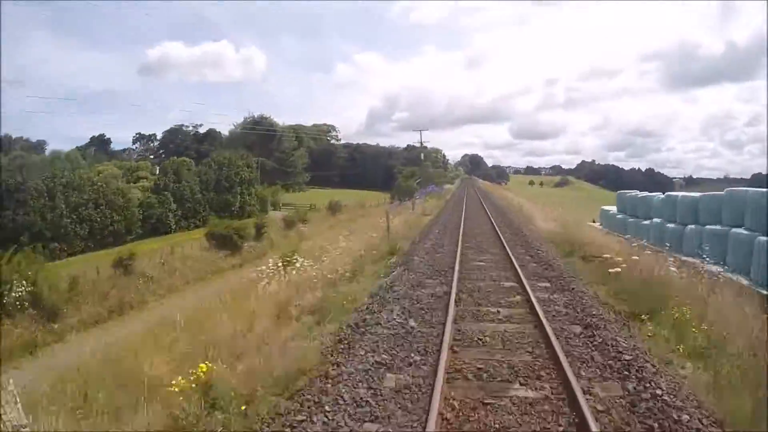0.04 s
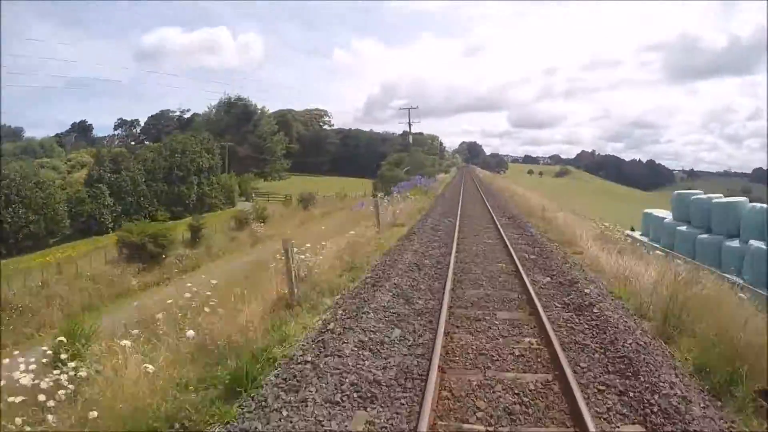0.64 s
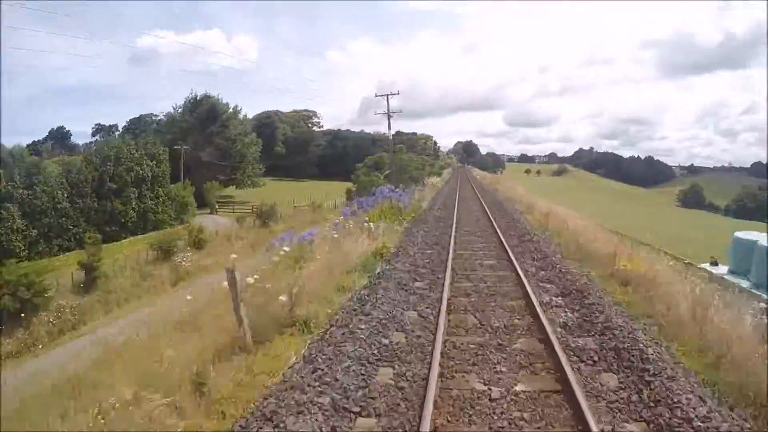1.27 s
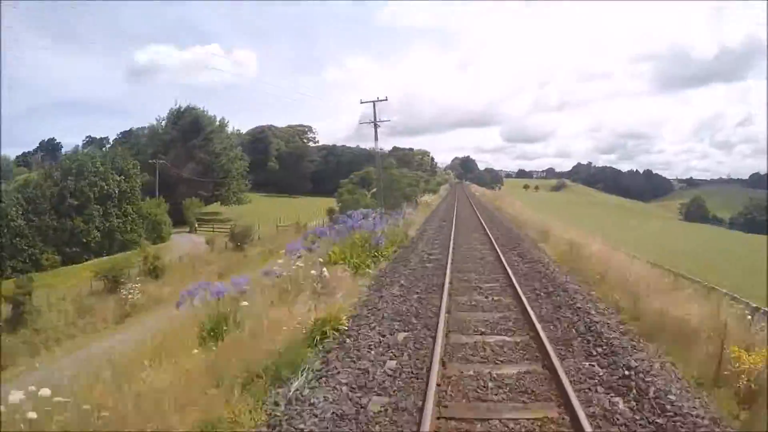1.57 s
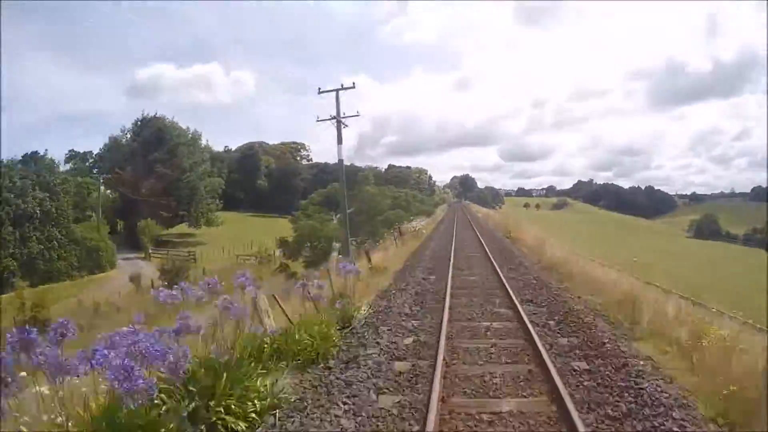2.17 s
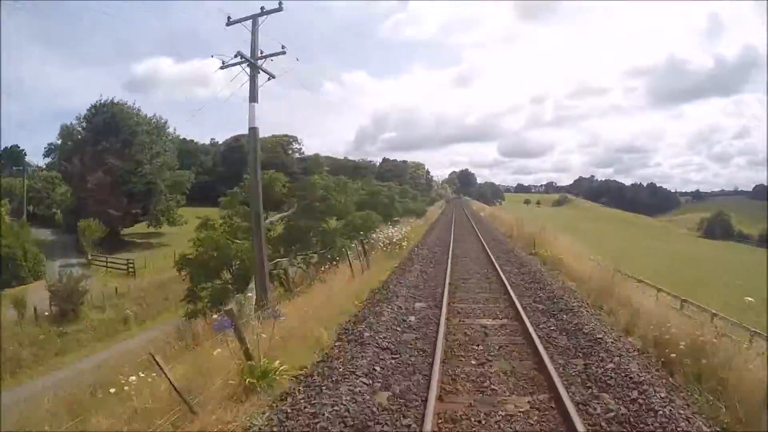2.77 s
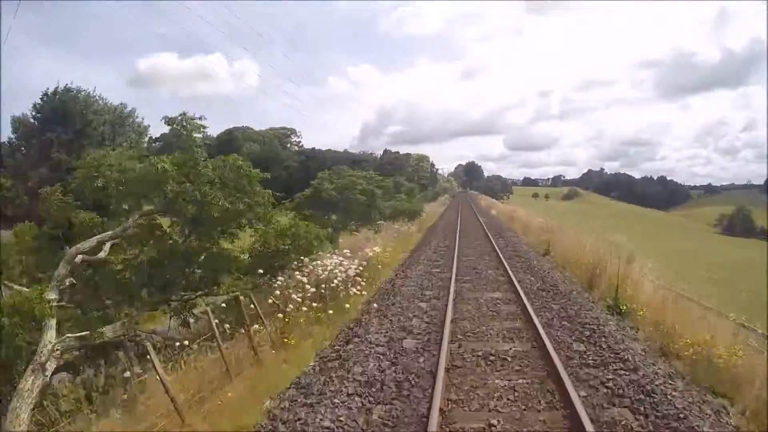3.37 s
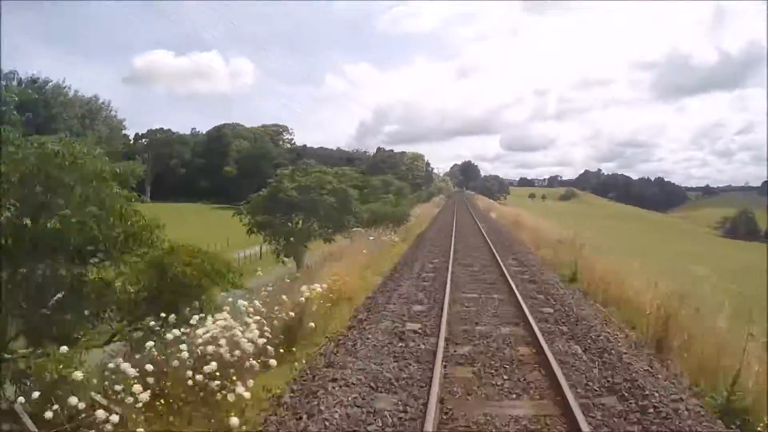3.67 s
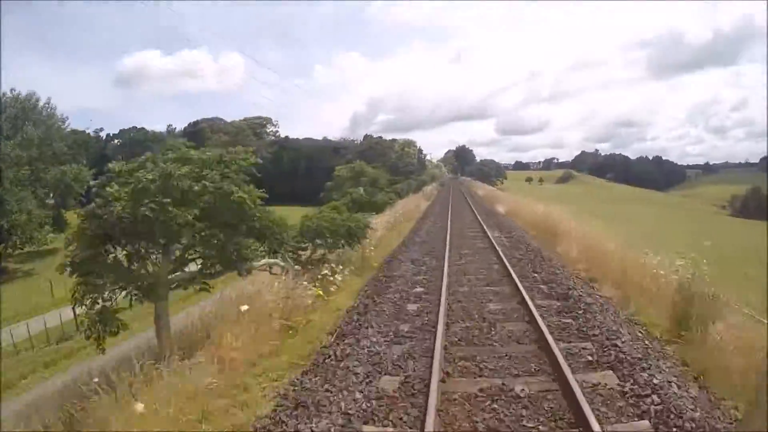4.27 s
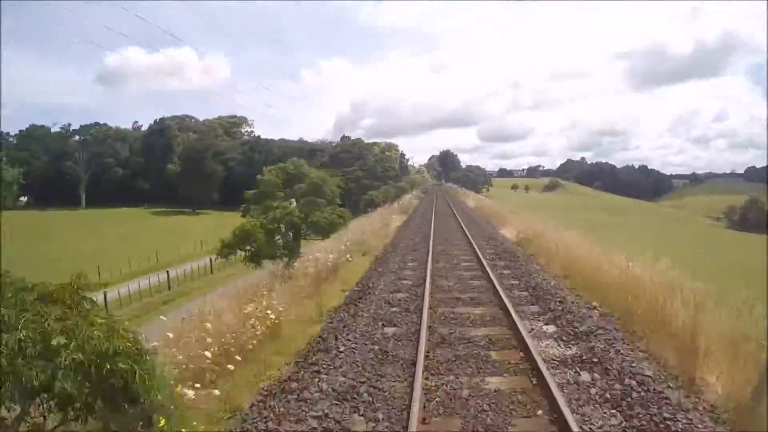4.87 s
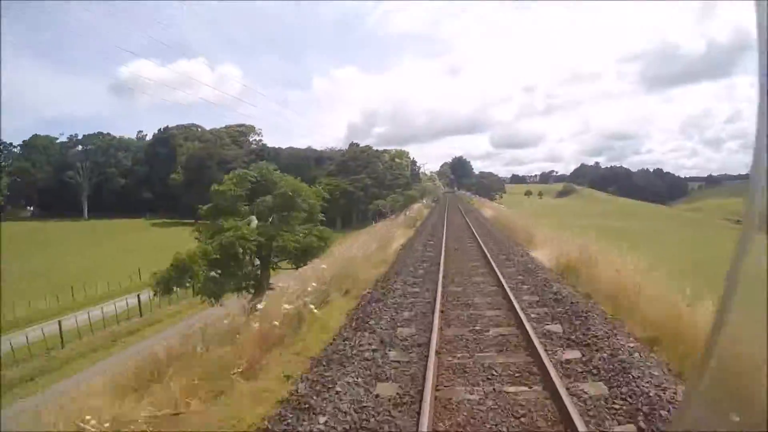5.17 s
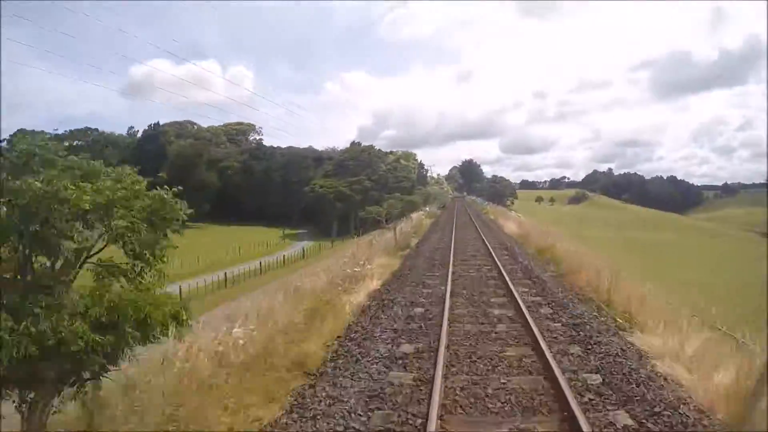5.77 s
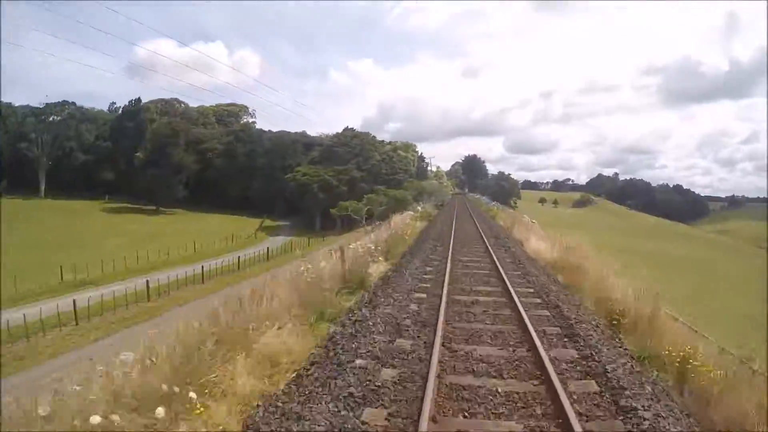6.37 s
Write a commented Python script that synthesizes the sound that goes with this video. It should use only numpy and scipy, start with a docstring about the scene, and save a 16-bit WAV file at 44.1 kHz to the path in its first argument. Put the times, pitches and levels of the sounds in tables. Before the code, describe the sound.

A small engine chugs at an even pace, with ticking valves and a metallic whirr, while wheels on rough rail shake a light trolley. Light rattles and a faint, high wheel squeal come and go. Late on, a sharp crack and deep thud distort the on-board microphone, and the sound turns quieter before gradually recovering. The rumble swells again near the end. Everything is close and in open air.

```python
"""A light rail trolley rumbles along a track, its small single-cylinder engine at a steady speed.
The rough rail shakes the chassis. The engine puffs exhaust, gasps for air and clatters as its piston
and valves strike. Loose parts rattle, a wheel squeals thinly, and the treble dips briefly now and then.
One hard jolt overloads the on-board microphone; its automatic volume control turns everything down
and slowly recovers."""
import sys
import numpy as np
from scipy import signal
from scipy.fft import rfft, irfft
from scipy.io import wavfile
from scipy.ndimage import uniform_filter1d

SR = 44100
rng = np.random.default_rng(int(sys.argv[2]) if len(sys.argv) > 2 else 0)


def dump_mix(stems):
    """Bounce the given channels to the path in sys.argv[1] as a 16-bit WAV at rate SR."""
    frames = np.atleast_2d(stems).T  # one column per channel
    limited = np.clip(frames, -1, 1)  # hard clip at full scale
    pcm = np.round(limited * 32767).astype(np.int16)
    wavfile.write(sys.argv[1], SR, pcm)


N = 291942
TIME = np.arange(N) / SR

# the tones at which the engine casing and covers ring: pitch_hz, width_hz, level_db
CASING_TONES = [(1120, 204, 4.5), (1814, 420, 2), (2188, 125, 2), (2394, 205, 3.5), (3372, 320, 1.5),
                (3730, 560, 4.5), (4706, 230, -6), (5590, 300, -6), (6900, 570, -10.5)]


def rumble(cycles):
    """Wheels on rough rail shake the chassis, which throbs with the engine; the upper part surges."""
    # how strongly the chassis rumbles, low to high: pitch_hz, level_db
    chassis_spectrum = [(10, 2), (25, 1), (60, 5), (110, 2.5), (160, -3), (210, -0.5), (280, -6.5),
                        (345, 0.5), (430, -3.5), (500, -13), (620, -26), (1000, -34.5), (2000, -62)]
    throb = 1 + 0.15 * np.cos(2 * np.pi * (cycles - .45))
    shake = rng.standard_normal(N) * throb
    upper = signal.sosfiltfilt(signal.butter(2, 240, "high", fs=SR, output="sos"), shake)
    surge = gain_of(1.3 * drift(11))
    rough_db = rough_rail_db()
    deep = gain_of(.8 * rough_db) * (shake - upper)
    return gain_of(-16.5) * shape_spectrum(deep + gain_of(rough_db) * surge * upper, chassis_spectrum)


def rough_rail_db():
    """The shaking swells and fades as the wheels cross each rough stretch of rail."""
    # rough stretches: middle_s, rise_db, length_s
    stretches = [(1.643, 3.5, 0.97), (4.09, 3.5, 0.22), (5.33, 5, .13), (6.436, 7, 0.29)]
    return sum(db * swell(middle_s, length_s) for middle_s, db, length_s in stretches)


def exhaust(cycles):
    """Muffled firing pulses make a hum: its low tones waver a little, the pipe smears the higher ones."""
    # tones of the hum: multiple (of the engine's cycle rate), level_db
    tones = [(1, -32), (2, -6), (3, 1.5), (4, -3), (5, -23), (6, -8), (7, -6), (8, 0.5), (9, -8),
             (10, -5.5), (11, -16), (12, -6.5), (13, -9.5), (14, -7.5), (15, -5), (16, -13.5), (17, -15.5),
             (18, -37), (19, -30), (20, -15), (21, -22), (22, -43.5)]
    # how the four lowest tones swell and sink: time_s, boost_db
    boom = [(0, 4), (1.5, -4.5), (3.2, 2), (4.8, 4), (5.4, -0.5), (6.6, 2.5)]
    hum, boom_db = np.zeros(N), curve(boom)
    for multiple, db in tones:
        smear = .25 * multiple * rng.standard_normal() + .016 * multiple * drift(2)
        level_db = db + (multiple <= 4) * boom_db + 1.6 * drift(4.6)
        hum += gain_of(level_db) * np.cos(2 * np.pi * multiple * (cycles - .5) + smear)
    return gain_of(-19) * unit_level(hum)


def clatter(cycles):
    """Piston and valves strike the casing in every cycle, over a steady whirr of moving parts."""
    # piston and valve blows: place_in_cycle (0 to 1), level_db
    strikes = [(0.182, 3), (0.452, 1), (0.681, 1), (.92, -6)]
    # the broad noise of the moving parts: pitch_hz, level_db
    whirr_spectrum = [(200, -19), (600, -9.5), (900, -1), (1600, 3.5), (2800, -2), (4200, -1), (6000, -7.5),
                      (7200, -11), (8200, -17.5), (10300, -20), (11500, -27.5), (14000, -27), (15500, -38)]
    blows = sum(gain_of(db) * burst(cycles, place, fade_cycles=0.4) for place, db in strikes)
    casing = np.zeros(N)
    for hz, width, db in CASING_TONES:
        buzz = (1.05 + blows) * rng.standard_normal(N) * gain_of(drift(6))  # each panel has its own
        casing += gain_of(db) * unit_level(ring(ring(buzz, hz, width), hz, width))
    whirr = shape_spectrum((3.1 + blows) * rng.standard_normal(N), whirr_spectrum)
    level_db = -29 + 0.31 * rough_rail_db()  # rough rail shakes the covers too
    return gain_of(level_db) * (unit_level(casing) + gain_of(-2.5) * whirr)


def intake(cycles):
    """The engine takes one short gasp of air each cycle."""
    # the hiss of the air: pitch_hz, level_db
    air_spectrum = [(1000, 9.5), (4000, 12.5), (7500, 5.5), (10300, -0.5), (11500, -8), (15000, -19)]
    gasp = burst(cycles, place=.43, fade_cycles=.16) * rng.standard_normal(N)
    return gain_of(-44) * shape_spectrum(gasp, air_spectrum)


def jolts():
    """A blow sets the microphone mount swinging: a huge, low thud with a soft start."""
    # blows that reach the mount: start_s, level_db
    blows = [(4.7792, 62), (4.893, 35)]
    # slow swings of the mount: pitch_hz, level_db, fade_s (time to fall by 60 dB)
    swings = [(28.8, -9.5, 0.19), (69.3, 7, 0.047)]
    out, t = np.zeros(N), np.arange(SR) / SR
    thud = sum(gain_of(db - 60 * t / fade_s) * np.sin(2 * np.pi * hz * t) for hz, db, fade_s in swings)
    soft_start = 1 - np.exp(-t / 0.026)
    for start_s, db in blows:
        add(out, start_s, gain_of(db) * thud * soft_start)
    return out


def knocks():
    """Each knock or rattle is a short crack with a rough pitch, which also sets the covers ringing."""
    # loose parts and wheels knocking: start_s, level_db, pitch_hz, fade_s (time to fall by 60 dB)
    hits = [(1.245, -16.5, 3400, 0.31), (1.862, -16, 2120, 0.018), (2.93, -21, 480, 0.09),
            (3.04, -17, 480, 0.054), (4.0848, -5, 1340, .024), (4.0914, -4, 2000, 0.028),
            (4.1, -4.5, 1970, 0.0046), (4.7812, 11.5, 1100, 0.0038), (4.7879, 26.5, 684, 0.0045),
            (4.8155, 0, 795, 0.0046), (6.452, -12, 2100, 0.03)]
    out, t = np.zeros(N), np.arange(SR // 8) / SR
    for start_s, db, hz, fade_s in hits + rattles():
        crack = rng.standard_normal(len(t)) * gain_of(-60 * t / fade_s)
        width_hz = 0.8 * hz
        bright = ring(crack, hz, width_hz)
        blow = ring(bright, hz, width_hz) + gain_of(-15) * bright
        covers = sum(gain_of(level) * ring(blow, pitch, width) for pitch, width, level in CASING_TONES)
        knock = blow + gain_of(-9.5) * covers
        add(out, start_s, gain_of(db) * knock / abs(knock).max())
    return out


def rattles(per_second=6, level_db=-21.5, scatter_db=4, pitch_hz=2180, fade_s=0.047):
    """Loose parts tap lightly at random moments; gives extra rows for the table in knocks()."""
    starts = np.cumsum(rng.uniform(.2, 1.8, size=80)) / per_second
    levels = level_db + scatter_db * rng.standard_normal(80)
    return [(start_s, db, pitch_hz, fade_s) for start_s, db in zip(starts, levels) if start_s < N / SR]


def squeal(pitch_hz=6690, width_hz=77):
    """A wheel rings on the rail with a high, fuzzy tone: faint and uneven, with short loud flares."""
    # the loudest squeals: middle_s, level_db
    squeals = [(0.246, -33), (2.298, -31), (2.866, -40), (4.045, -34), (4.735, -34.5)]
    singing = gain_of(-45 + 3 * drift(22))
    flares = sum(gain_of(db) * swell(middle_s, length_s=0.03) for middle_s, db in squeals)
    tone = ring(ring(rng.standard_normal(N), pitch_hz, width_hz), pitch_hz, width_hz)
    return gain_of(-4.5) * (singing + flares) * unit_level(tone)


def dip_treble(x):
    """The treble sinks for about a hundredth of a second now and then."""
    # moments when the treble dips: middle_s
    moments = [.403, 1.086, 1.319, 1.768, 2.302, 2.537, 3.667, 4.992, 5.567, 6.035]
    dip = sum(np.exp(-((TIME - middle_s) / .007) ** 4) for middle_s in moments)
    treble = signal.sosfiltfilt(signal.butter(2, 3600, "high", fs=SR, output="sos"), x)
    return x - 0.93 * dip * treble


def burst(cycles, place, fade_cycles, scatter_db=3.5):
    """A level that jumps and dies away once a cycle, never twice the same in strength or timing."""
    position = cycles - place + 2 + .02 * drift(20)
    strength = gain_of(scatter_db * rng.standard_normal(256))
    return strength[position.astype(int)] * np.exp(-(position % 1) / fade_cycles)


def gain_of(db):
    """Turns decibels into a number to multiply a sound by."""
    return 10 ** (np.asarray(db) / 20)


def unit_level(x):
    """Scales a signal to an average (root mean square) level of 1."""
    return x / np.sqrt(np.mean(x ** 2) + 1e-20)


def curve(rows):
    """Joins (time_s, value) points with straight lines."""
    return np.interp(TIME, *np.transpose(rows))


def swell(middle_s, length_s):
    """A smooth rise from 0 to 1 and back."""
    return np.exp(-(2 * (TIME - middle_s) / length_s) ** 2)


def shape_spectrum(x, points):
    """Sets the balance of low and high from (pitch_hz, level_db) points; the result has level 1."""
    hz, db = np.transpose(points)
    all_hz = np.fft.rfftfreq(N, 1 / SR)
    shape_db = np.interp(np.log(all_hz + 1), np.log(hz), db)
    return unit_level(irfft(rfft(x) * gain_of(shape_db), N))


def drift(hz):
    """A slow random wobble of level 1, with up to about hz swings a second."""
    noise = rng.standard_normal(N // 64 + 1)
    rates_hz = np.fft.rfftfreq(len(noise), 64 / SR)
    slow = irfft(rfft(noise) / (1 + (rates_hz / hz) ** 4), len(noise))
    return unit_level(np.interp(np.arange(N) / 64, np.arange(len(noise)), slow))


def ring(x, hz, width_hz):
    """Keeps the part of a sound near one pitch, as a ringing object does."""
    return signal.lfilter(*signal.iirpeak(hz, hz / width_hz, SR), x)


def add(mix, start_s, sound):
    """Mixes a sound in at its start time."""
    part = mix[round(start_s * SR):][:len(sound)]
    part += sound[:len(part)]


def scene():
    """Everything rides on the trolley, close to one microphone in open air."""
    # speed of the four-stroke engine: time_s, cycles_per_s
    speed = [(0, 21.55), (2.5, 21.54), (3.3, 21.5), (6.6, 21.5)]
    cycles = np.cumsum(curve(speed)) / SR  # engine cycles counted so far
    engine = exhaust(cycles) + clatter(cycles) + intake(cycles)
    wheels = rumble(cycles) + squeal()
    return (dip_treble(engine + wheels) + knocks() + jolts())[None]


def volume_cut_db(x, threshold_db, share, recovery_db_per_s):
    """Works out the volume cut: a share of each peak's excess over the threshold, let go slowly."""
    wanted_db = share * np.maximum(20 * np.log10(abs(x) + 1e-9) - threshold_db, 0)
    recovery_db = recovery_db_per_s * TIME
    held_db = np.maximum.accumulate(wanted_db + recovery_db) - recovery_db
    return uniform_filter1d(held_db, size=1700)  # smoothed, so the cut starts just before the peak


def record(dry):
    """Volume control turns loud moments down, the bass most; peaks overload; the top treble is cut."""
    x = dry[0]
    filters = [signal.butter(2, 240, kind, fs=SR, output="sos") for kind in ("low", "high")]
    bass, rest = (signal.sosfilt(np.tile(sos, (2, 1)), x) for sos in filters)
    cut_db = volume_cut_db(x, threshold_db=-2, share=0.59, recovery_db_per_s=12)
    bass_cut_db = volume_cut_db(bass, threshold_db=6, share=1.206, recovery_db_per_s=31.5)
    turned_down = bass * gain_of(-np.maximum(cut_db, bass_cut_db)) + rest * gain_of(-cut_db)
    clipped = turned_down / (1 + turned_down ** 6) ** (1 / 6)  # overload rounds off the peaks
    treble_limit = signal.firwin(511, 15400, window=("kaiser", 9), fs=SR)
    return signal.oaconvolve(clipped, treble_limit, "same")[None]


dry = scene()
out = record(dry)
dump_mix(out)
```